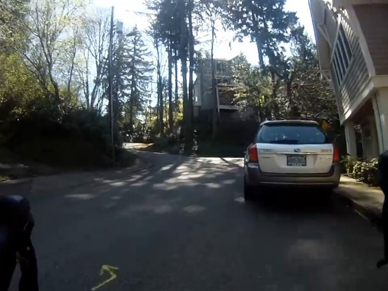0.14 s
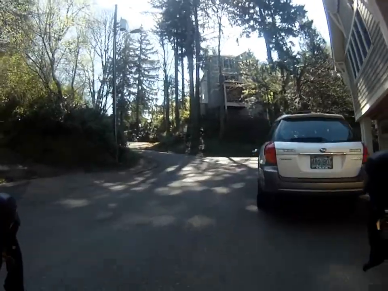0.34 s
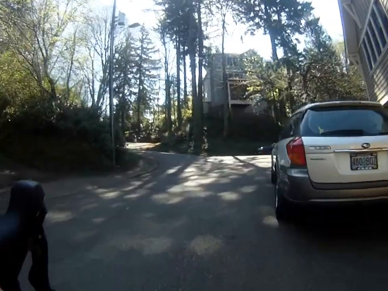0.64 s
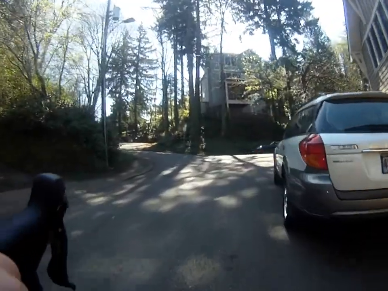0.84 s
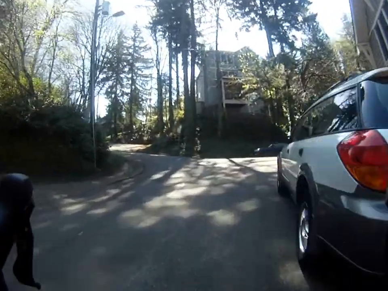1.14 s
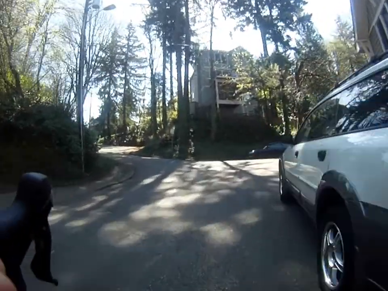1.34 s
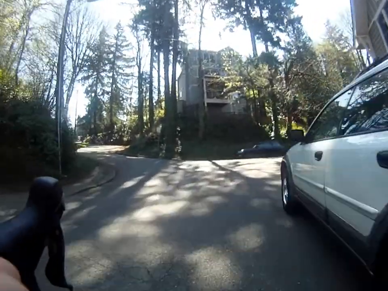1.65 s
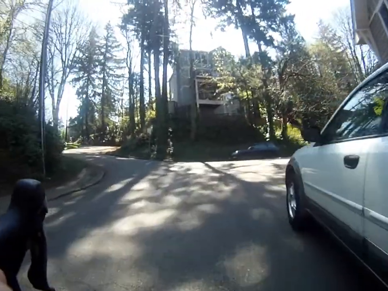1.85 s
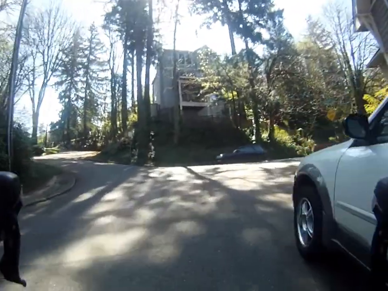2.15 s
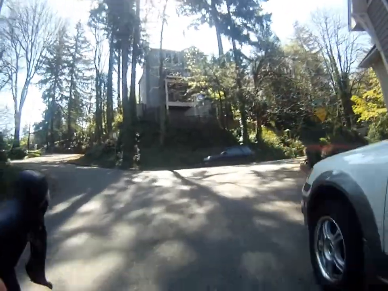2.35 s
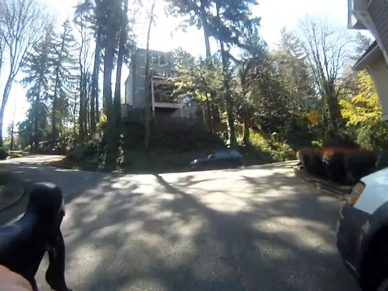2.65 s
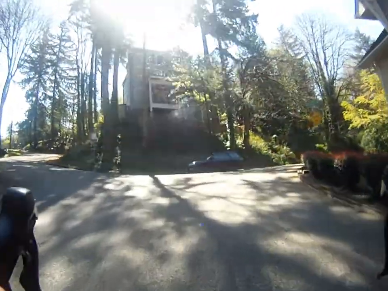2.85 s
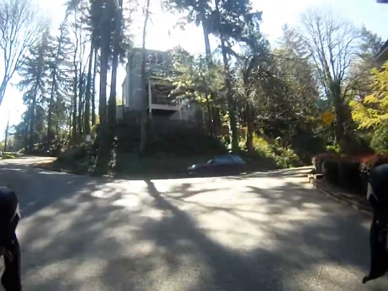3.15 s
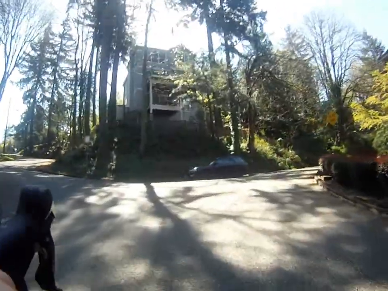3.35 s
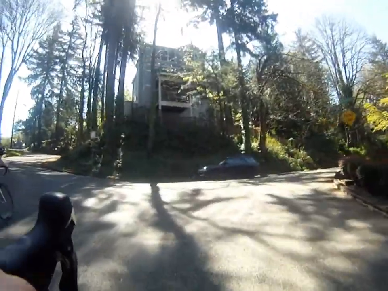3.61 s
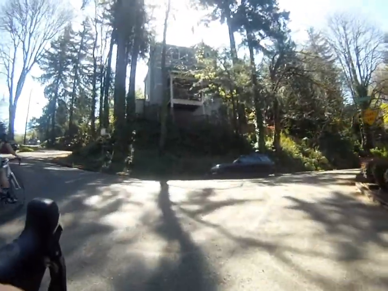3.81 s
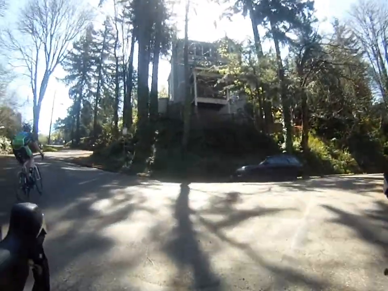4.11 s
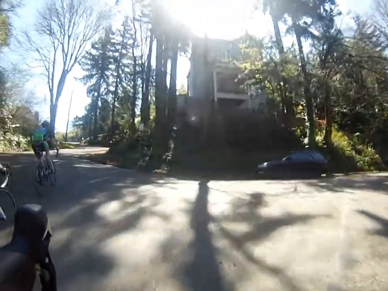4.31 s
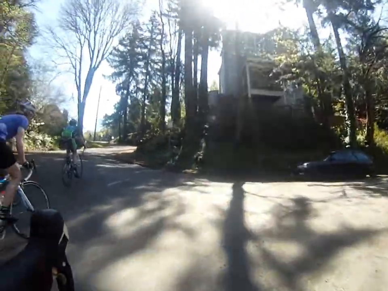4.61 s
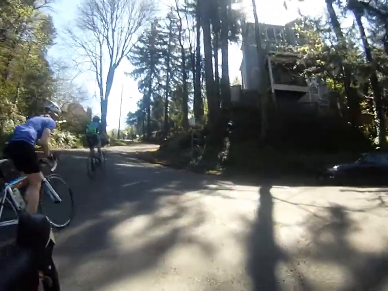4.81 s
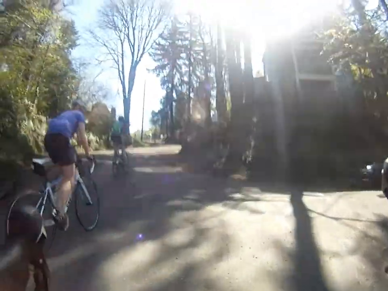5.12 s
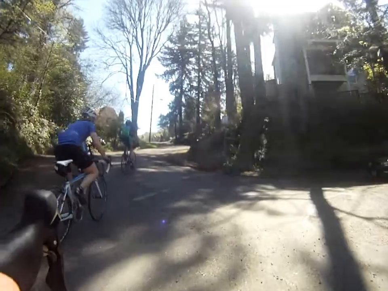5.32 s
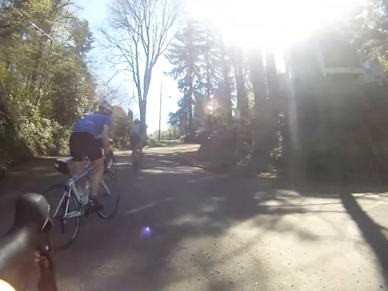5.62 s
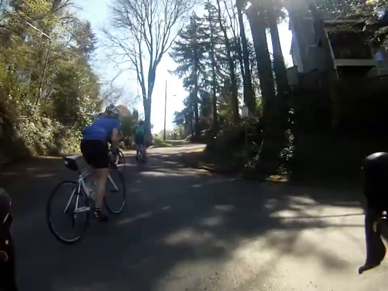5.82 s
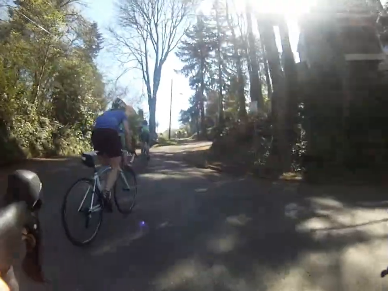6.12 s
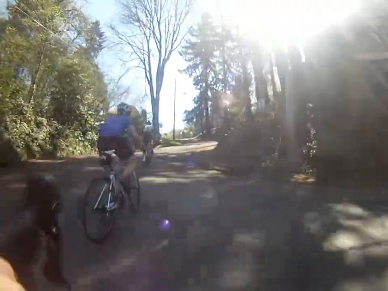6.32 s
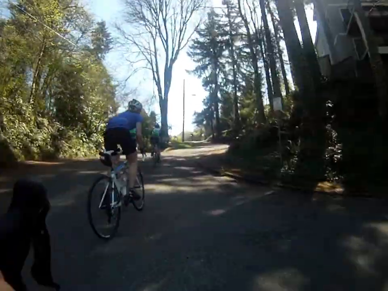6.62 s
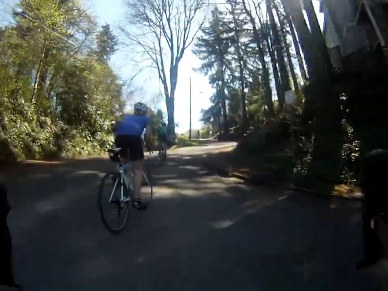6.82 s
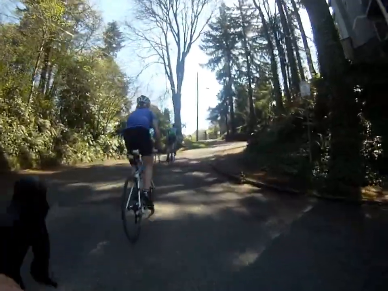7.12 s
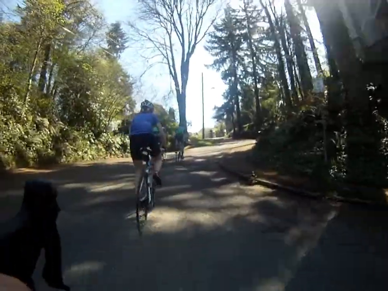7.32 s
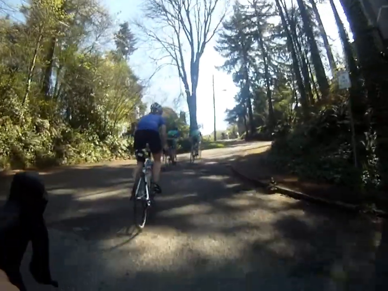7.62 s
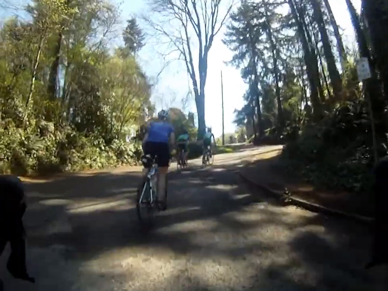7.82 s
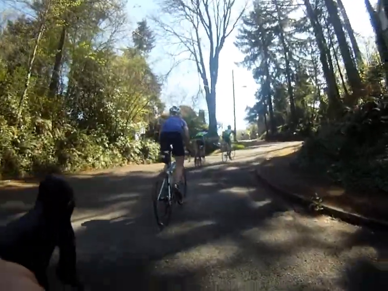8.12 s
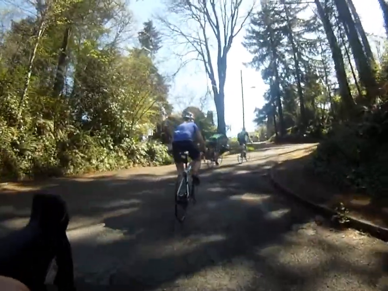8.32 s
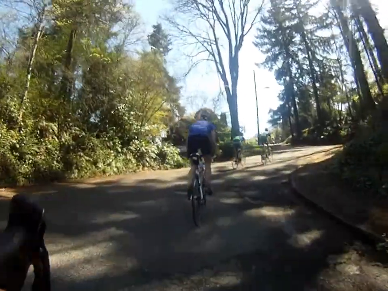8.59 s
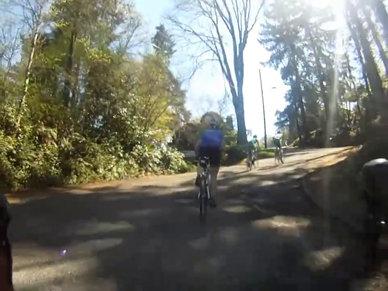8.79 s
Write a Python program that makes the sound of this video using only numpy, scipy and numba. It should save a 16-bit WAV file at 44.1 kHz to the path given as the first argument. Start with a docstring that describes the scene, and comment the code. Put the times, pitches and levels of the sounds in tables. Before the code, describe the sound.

From 0 to about 9 seconds, a bicycle rolls steadily on asphalt, heard from a camera loosely mounted on its handlebar. A low rumble, hum and gritty midrange buzz run throughout, swelling on coarser pavement near 4, 5.1-5.5, 6.7 and 8.6 s. The mount shudders about thirty times a second, with paired scratchy ticks that flutter louder and softer. Very close, the camera hits its hard housing: a strong double knock near 0.4 s, then bright, short plastic clacks at uneven spacing, several each second. Lighter ticks cluster around 3.7-4.0 s. Hard, scuffing jolts arrive near 4.5, 4.8 and 5.2 s, followed by somewhat sparser knocks, another sharp jolt at 7.6 s and an especially hard clack at 7.8 s. Rattling continues to the end. The loudest blows distort and briefly duck everything; a brittle, metallic digital treble coats the sound, identical in both channels.

```python
"""On a bicycle's handlebar over asphalt: one microphone in a camera that rides loosely in a hard housing.
Beneath, the road hums and buzzes up through the frame: noise and uneven jolts shake its resonances.
The mount sways about thirty times a second, a low sine, and ticks twice in each cycle.
Closest, the camera knocks on its housing: blows set decaying modes ringing. The recorder ducks after loud
knocks, overloads, and holds each sample of a 12 kHz converter, which mirrors the whole sound into the treble."""
import sys
import numpy as np
from scipy import signal
from scipy.fft import rfft, irfft
from scipy.io import wavfile
from numba import njit

SR = 44100
rng = np.random.default_rng(int(sys.argv[2]) if len(sys.argv) > 2 else 0)


def to_linear_factor(level_db):
    """Convert decibel levels (scalar or array-like) to linear amplitude factors."""
    exponent = np.asarray(level_db, float) / 20
    return 10 ** exponent


def materialize(psi):
    """Save the field psi as 16-bit PCM at rate SR to the path in sys.argv[1].

    A 1-D psi becomes a single channel; in a 2-D psi each row is a channel.
    """
    bounded = np.clip(np.atleast_2d(psi).T, -1, 1)
    quanta = np.round(bounded * 32767).astype(np.int16)
    wavfile.write(sys.argv[1], SR, quanta)


N = 394694


def in_time(rows):
    """Columns of a table, joined by straight lines in time."""
    start_s, *columns = np.transpose(rows)
    return [np.interp(np.arange(N) / SR, start_s, column) for column in columns]


def rms_one(x):
    """Scaled to unit rms."""
    return x / np.sqrt(np.mean(x ** 2) + 1e-20)


def drift(rate_hz):
    """Slow chance: noise twice through a one-pole low-pass, made at a fortieth of the rate; spread 1."""
    r = np.exp(-2 * np.pi * rate_hz * 40 / SR)
    noise = rng.standard_normal(N // 40 + 2002)
    slow = signal.lfilter([1], [1, -2 * r, r * r], noise)[2000:]   # the filter has settled by then
    return np.interp(np.arange(N) / 40, np.arange(len(slow)), rms_one(slow))


def resonant(shaking, peaks, patchy_db, rate_hz):
    """Shaking through parallel resonances, each swelling and fading on its own; rms 1."""
    out = 0
    for k, (pitch_hz, width_hz, level_db) in enumerate(peaks):
        r = np.exp(-np.pi * width_hz / SR)
        w = 2 * np.pi * pitch_hz / SR
        band = signal.lfilter([1, 0, -1], [1, -2 * r * np.cos(w), r * r], shaking)
        gain = to_linear_factor(level_db + patchy_db * drift(rate_hz))
        out = out + (-1) ** k * gain * rms_one(band)
    return rms_one(out)


def struck(modes, at_s, blow_db, scatter_db, tilt_db=0):
    """Every blow sets each mode ringing, tilted by dB per octave about 3 kHz; neighbours in opposite phase."""
    at = np.clip((np.asarray(at_s) * SR).astype(int), 0, N - 1)
    luck = rng.standard_normal((len(at), len(modes)))
    out = np.zeros(N)
    for k, (pitch_hz, level_db, t60_s) in enumerate(modes):
        tilted_db = blow_db + level_db + tilt_db * np.log2(pitch_hz / 3000)
        clicks = np.full(N, 1e-18)
        clicks[at] = to_linear_factor(tilted_db + scatter_db * luck[:, k]) * (-1) ** k
        r = to_linear_factor(-60 / (t60_s * SR))
        w = 2 * np.pi * pitch_hz / SR
        out += signal.lfilter([0, np.sin(w)], [1, -2 * r * np.cos(w), r * r], clicks)
    return out


def scuffed(at_s, blow_db, spread_s, fade_db_per_s):
    """A loose contact: the first touch and four fainter ones trailing it at random."""
    late_s = rng.exponential(spread_s, (len(at_s), 5)) * [0, 1, 1, 1, 1]
    touch_s = at_s[:, None] + late_s
    touch_db = blow_db[:, None] - fade_db_per_s * late_s
    return touch_s.ravel(), touch_db.ravel()


# spectrum of the rolling noise: pitch_hz [Hz], level_db [dB per Hz, relative]
ROLL_SPECTRUM = [(15, -29), (25, 22.5), (52, 6), (166, 7), (352, -11.5), (980, -4), (1230, -9), (2080, -13),
                 (2330, -87), (2670, -19), (5800, -42), (7540, -69), (12800, -120)]


def roll(rough_db):
    """Broad rolling noise, shaped in frequency, slightly louder on coarse asphalt."""
    pitch_hz, level_db = np.transpose(ROLL_SPECTRUM)
    bins_hz = np.arange(1, N // 2 + 2) * SR / N
    colour = to_linear_factor(np.interp(np.log(bins_hz), np.log(pitch_hz), level_db))
    noise = irfft(rfft(rng.standard_normal(N)) * colour, N)
    return to_linear_factor(-40 + 0.18 * rough_db) * rms_one(noise)   # 0.18 dB per dB of coarseness


# lowest resonances shaken by the road: pitch_hz [Hz], width_hz [Hz], level_db [dB, relative]
THUMP_PEAKS = [(53.9, 4.4, 7.5), (105, 46, -2.5), (125, 90, -9), (154, 20, -11)]


def thump(rough_db):
    """Noise through the lowest resonances, a rumble that follows the coarseness and wavers."""
    level_db = -37 + 0.85 * rough_db + 2.4 * drift(5.7)
    return to_linear_factor(level_db) * resonant(rng.standard_normal(N), THUMP_PEAKS, patchy_db=0.0, rate_hz=13)


# resonances of the low hum: pitch_hz [Hz], width_hz [Hz], level_db [dB, relative]
HUM_PEAKS = [(241.3, 14.6, -6.5), (344.2, 35, -4.5), (401.5, 99, -7)]


def hum(hum_db):
    """Noise through low resonances, heard as a hum through the frame."""
    mean_over_steady_db = 3
    ringing = resonant(rng.standard_normal(N), HUM_PEAKS, patchy_db=1.15, rate_hz=6.7)
    return to_linear_factor(hum_db + mean_over_steady_db) * ringing


def grit():
    """Grit under the tyres: uneven jolts of either sign, about 600 a second, over noise; it flickers."""
    falls = rng.random(N) < 600 / SR
    strength = to_linear_factor(2.8 * np.minimum(rng.exponential(1, N), 5))
    jolts = falls * strength * rng.choice([-1, 1], N)
    return (rms_one(jolts) + 0.8 * rng.standard_normal(N)) * to_linear_factor(2.97 * drift(41.5))


# resonances brought out by coarse asphalt: pitch_hz [Hz], width_hz [Hz], level_db [dB, relative]
COARSE_PEAKS = [(480, 66, -3.5), (574, 65, -4.5)]


def coarse(shaking, rough_db):
    """Grit through two resonances that rise steeply with the coarseness."""
    ringing = resonant(shaking, COARSE_PEAKS, patchy_db=2.5, rate_hz=8.5)
    return to_linear_factor(-45.5 + 1.7 * rough_db) * ringing


# frame and housing resonances: pitch_hz [Hz], width_hz [Hz], level_db [dB, relative]
BUZZ_PEAKS = [(793, 155, -5), (1116, 39, -4.5), (1258, 120, 0), (1836, 120, -4), (2074, 90, 0.5),
              (2740, 160, -2), (3700, 260, -8.5)]


def buzz(shaking, buzz_db):
    """Grit shakes the frame and housing resonances, each flickering on its own."""
    mean_over_steady_db = 3.0
    level_db = buzz_db + mean_over_steady_db + 0.86 * drift(3.5)
    return to_linear_factor(level_db) * resonant(shaking, BUZZ_PEAKS, patchy_db=1.5, rate_hz=34)


# the asphalt passing below: start_s [s], buzz_db [dB, steady level, also the coarseness],
# hum_db [dB, steady level]
ASPHALT = [(0.0, -39.5, -35.5), (0.5, -37.5, -35.5), (1.17, -36.5, -34.5), (2.09, -38, -34.5),
           (2.34, -38, -33), (2.59, -36, -34), (3.19, -38.5, -37), (3.96, -34.5, -35), (4.16, -38.5, -36),
           (4.44, -37.5, -37.5), (5.11, -34.5, -35.5), (5.51, -34, -32.5), (5.81, -38, -37),
           (6.66, -34, -35), (7.35, -38.5, -35.5), (7.68, -35.5, -35), (7.83, -38, -38), (8.42, -38, -36),
           (8.62, -34.5, -33.5), (8.95, -36.5, -36.5)]


def road():
    """The asphalt below: its coarseness drives the layers, and one grit shakes both buzz and coarse peaks."""
    buzz_db, hum_db = in_time(ASPHALT)
    rough_db = buzz_db - buzz_db.mean()
    shaking = grit()
    low = roll(rough_db) + thump(rough_db) + hum(hum_db)
    return low + coarse(shaking, rough_db) + buzz(shaking, buzz_db)


# modes of the loose clamp: pitch_hz [Hz], level_db [dB, relative], t60_s [s]
CLAMP_MODES = [(4014, -7, 0.013), (3460, -13, 0.008), (4100, -31, 0.0045), (3060, -10, 0.014),
               (4680, -8, 0.0029), (5430, -13, 0.0067), (5500, -26, 0.0071), (1310, -6, 0.011)]


def ticks(turns, force_db):
    """The clamp's slack closes with a short scuff every half cycle of sway, with stray contacts between."""
    closes = np.flatnonzero(np.diff(np.floor(2 * turns)))
    luck = rng.standard_normal((len(closes), 2))
    at_s = closes / SR + 0.00073 * luck[:, 0]
    level_db = -33.5 + force_db[closes] + 2.5 * luck[:, 1]
    touches = scuffed(at_s, level_db, spread_s=0.0013, fade_db_per_s=1800)
    loose = rng.random((1500, 2))      # stray contacts: (moment, weakness)
    stray = (loose[:, 0] * (N - 1)).astype(int)
    stray_db = -47.0 + force_db[stray] - 12.0 * loose[:, 1]
    crackle = struck(CLAMP_MODES, stray / SR, stray_db, scatter_db=2.0)
    return crackle + struck(CLAMP_MODES, *touches, scatter_db=4.5)


# the mount's sway before its waver: start_s [s], pitch_hz [Hz], level_db [dB rms]
MOUNT_SWAY = [(0.0, 34.1, -42.5), (0.62, 32.3, -29.5), (0.97, 29.05, -38), (1.42, 29.3, -41),
              (1.62, 34.4, -25), (1.82, 41.85, -44), (2.07, 42.4, -35), (2.34, 31.7, -39),
              (2.59, 31.8, -21.5), (2.86, 28.8, -39), (3.21, 30.6, -24.5), (3.34, 34.37, -40),
              (3.49, 30.17, -24), (3.89, 30.3, -34), (4.83, 30.37, -26.5), (5.46, 29.06, -22),
              (5.66, 34.3, -39), (6.11, 35.26, -24.5), (6.63, 32.67, -29.5), (6.76, 35.4, -31),
              (6.88, 30.24, -29.5), (7.95, 30.25, -23), (8.23, 31.83, -26.5), (8.95, 30.1, -24.5)]


def mount():
    """The mount swings as a wavering low sine; its clamp ticks harder when it sways harder."""
    pitch_hz, level_db = in_time(MOUNT_SWAY)
    usual_db, waver_hz = -27, 1.6
    sway_db = level_db + 3.2 * drift(5.7)
    turns = np.cumsum(pitch_hz + waver_hz * drift(4.8)) / SR
    sway = np.sqrt(2) * to_linear_factor(sway_db) * np.sin(2 * np.pi * turns)
    return sway + ticks(turns, sway_db - usual_db)   # 1 dB of tick per dB of sway


# bumps that jolt the whole mount: start_s [s], blow_db [dB, relative]
MOUNT_JOLTS = [(0.554, -23), (4.4946, 7), (4.558, -4.5), (4.823, -3), (4.8288, 5.5), (4.884, -5.5),
               (5.1968, -2), (5.337, -4.5), (5.441, -9), (7.6278, 0), (7.802, -11), (7.932, -17.5),
               (7.952, -5), (8.015, -15), (8.424, -7.5)]
# modes of the frame: pitch_hz [Hz], level_db [dB, relative], t60_s [s]
FRAME_MODES = [(410, -9, 0.0079), (808, -17.5, 0.033), (1110, -6.5, 0.01), (1350, -1, 0.0069),
               (1900, 1.5, 0.0025), (2110, -2.5, 0.014), (2786, -3.5, 0.012), (3300, -4, 0.0051),
               (3950, -4.5, 0.0089)]


def mount_jolts():
    """Each bump is a loose contact whose trailing touches ring the frame."""
    start_s, blow_db = np.transpose(MOUNT_JOLTS)
    touches = scuffed(start_s, blow_db - 8.0, spread_s=0.0025, fade_db_per_s=1200)
    return struck(FRAME_MODES, *touches, scatter_db=3.5)


def contact(modes, blows, usual_db):
    """A contact point rings nearly alike each time; harder blows are shorter contacts, thinner and brighter."""
    start_s, blow_db = np.transpose(blows)
    return struck(modes, start_s, blow_db, scatter_db=0.33, tilt_db=0.22 * (blow_db - usual_db))


# camera against the housing's door: start_s [s], blow_db [dB, relative]
DOOR_BLOWS = [(0.3786, 0), (1.5726, -7), (1.6602, -6.5), (2.525, -8.5), (3.407, -2.5), (4.0952, -2),
              (4.4295, -4.5), (4.5591, -4.5), (4.7836, -4.5), (5.091, -7), (5.1969, 6.5), (5.2144, -7.5),
              (5.4056, -12), (6.2026, -8), (6.376, -8), (6.5328, -2.5), (6.9188, -4.5), (7.449, -14),
              (7.5216, -13.5), (7.6277, 1), (7.7743, -6.5), (7.9514, -12), (8.4233, -8), (8.5386, -4.5),
              (8.7846, -10.5)]
# modes of the door, close pairs beat: pitch_hz [Hz], level_db [dB, relative], t60_s [s]
DOOR_MODES = [(768, -13.8, 0.0531), (1167, 9.5, 0.0077), (1187, 9.0, 0.0075), (1926, -10.1, 0.0112),
              (2247, -15.8, 0.0143), (2504, -1.4, 0.0133), (2918, 9.5, 0.0047), (3008, 7.8, 0.0077),
              (3323, -17.5, 0.0208), (3943, 6.9, 0.0044), (3860, 9.5, 0.004), (4352, -9.9, 0.0069),
              (5300, -17, 0.007), (5650, -24, 0.006)]


def door_knocks():
    """The camera strikes the housing's door, a hollower knock."""
    return contact(DOOR_MODES, DOOR_BLOWS, usual_db=-9.0)


# camera against the housing's wall: start_s [s], blow_db [dB, relative]
WALL_BLOWS = [(0.3619, 7), (0.6284, 8.5), (0.683, -11.5), (0.7328, 4), (0.8903, 0.5), (0.961, -11.5),
              (1.1553, 1.5), (1.191, -15), (1.2046, -2.5), (1.3356, -10), (1.51, 6.5), (1.6262, 3),
              (1.759, 5), (1.9399, 5.5), (2.0158, 4.5), (2.1729, 0.5), (2.2213, 1), (2.2322, -4.5),
              (2.2747, 5), (2.5078, -8.5), (2.5189, -7.5), (2.7508, 7.5), (2.824, -6.5), (2.9018, 5),
              (3.0274, 4), (3.1347, -3), (3.1466, -11), (3.355, 2.5), (3.4317, -6), (3.4425, -5),
              (3.6624, 1.5), (3.6762, -8.5), (3.706, -14.5), (3.7575, -10), (3.7963, -3.5), (3.8, -6.5),
              (3.813, -14), (3.8517, 1.5), (3.8924, -2), (3.943, -7), (3.956, -9), (4.0479, 0),
              (4.141, -16.5), (4.2895, 6.5), (4.4178, 3), (4.495, 8.5), (4.7282, 1), (4.829, 8),
              (5.1972, 5), (5.3284, -13.5), (5.338, -12), (5.443, -9.5), (5.7754, -0.5), (5.8658, -1),
              (5.999, -4.5), (6.311, -3), (6.42, -16), (6.6099, -0.5), (6.7149, 5.5), (6.718, -9),
              (6.7873, -9), (7.0898, 0), (7.2288, 1.5), (7.5873, -4.5), (7.628, 1.5), (7.8396, 11.5),
              (8.1184, -0.3), (8.2925, -4.5), (8.4969, -5), (8.609, -14.5), (8.734, 2)]
# modes of the wall; close pairs beat, so a knock swells for a millisecond, holds and then drops:
# pitch_hz [Hz], level_db [dB, relative], t60_s [s]
WALL_MODES = [(775, -36, 0.04), (1256, -15.4, 0.0166), (1416, -16.5, 0.0245), (1870, 4.4, 0.0044),
              (1908, 3.4, 0.0059), (2595, -6.0, 0.0081), (2897, 7.0, 0.0077), (3070, 5.5, 0.0078),
              (3745, 1.1, 0.0049), (3621, -1.3, 0.0059), (4354, -24.6, 0.0141), (5082, 4.4, 0.006),
              (5093, 3.5, 0.0072), (5550, -24, 0.005), (2960, -31, 0.03)]


def wall_knocks():
    """The camera strikes the housing's wall, a bright tick; the hardest blows rebound lightly."""
    faint_db, faint_spread_db, faint_wait_s = -24.5, 2.5, 0.05
    start_s, blow_db = np.transpose(WALL_BLOWS)
    hard_s = start_s[blow_db > 2]
    late, strong = rng.standard_normal((2, len(hard_s)))
    rebound_s = hard_s + faint_wait_s * np.exp(0.25 * late)
    rebound_db = faint_db + faint_spread_db * strong
    rebounds = np.column_stack([rebound_s, rebound_db])
    return contact(WALL_MODES, np.vstack([WALL_BLOWS, rebounds]), usual_db=-5.0)


def scene():
    """One microphone feeds both channels: road below, mount beneath the camera, knocks closest."""
    knocks = mount_jolts() + door_knocks() + wall_knocks()
    return np.tile(road() + mount() + knocks, (2, 1))


@njit
def duck(over_db, attack, hold, hold_per_db, knee_db, longest, release):
    """The highest excess over the mark is held, longer past the knee, then let go; the cut follows with a lag."""
    peak, cut, wait, out = 0.0, 0.0, 0.0, np.zeros(len(over_db))
    for i in range(len(over_db)):
        if over_db[i] > peak:
            peak = over_db[i]
            wait = hold + min(hold_per_db * max(over_db[i] - knee_db, 0.0), longest)
        elif wait > 0:
            wait -= 1
        else:
            peak *= release
        cut += attack * (peak - cut)
        out[i] = cut
    return out


def band_limit(x):
    """A steep low-pass at the top of the band."""
    return signal.sosfilt(signal.butter(12, 16470, fs=SR, output="sos"), x)


def record(dry):
    """Sampled at 12 kHz with gain control and overload; each sample is held four times, then the top is cut."""
    held_rate = 12000   # Hz
    mark_db, share, knee_db = -1.5, 0.94, 11.0   # share: dB of cut per dB over the mark
    attack_s, hold_s, hold_s_per_db, longest_s = 0.001, 0.019, 0.8, 0.036   # longest extra hold
    release_s, lag_s = 0.0083, 0.0067
    slow = signal.resample_poly(dry[0], 40, 147)
    over_db = share * (20 * np.log10(np.abs(slow) + 1e-9) - mark_db)
    cut_db = duck(over_db, 1 / (attack_s * held_rate), hold_s * held_rate, hold_s_per_db * held_rate,
                  knee_db, longest_s * held_rate, np.exp(-1 / (release_s * held_rate)))
    cut_db = np.roll(cut_db, round(lag_s * held_rate))   # the gain moves only after the knock has passed
    overloaded = np.clip(slow * to_linear_factor(-cut_db), -1.15, 1.15)
    held = signal.resample_poly(np.repeat(overloaded, 4), 147, 160)[:N]   # 48 kHz to SR
    held = np.pad(held, (0, N - len(held)))
    bins_hz = np.arange(N // 2 + 1) * SR / N
    top_db = np.interp(bins_hz, [15050, 15350, 16350, 16600], [-1, -20, -26, -70])
    mix = irfft(rfft(held) * to_linear_factor(top_db), N)
    return band_limit(np.tile(np.clip(mix, -.96, .96), (2, 1)))


dry = scene()
out = record(dry)
materialize(out)
```